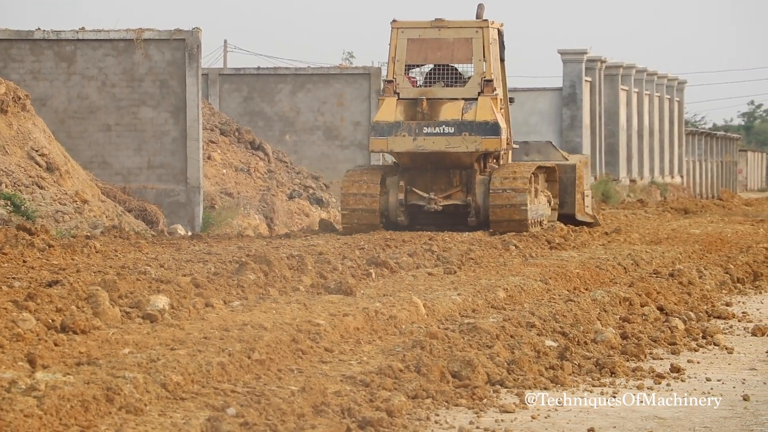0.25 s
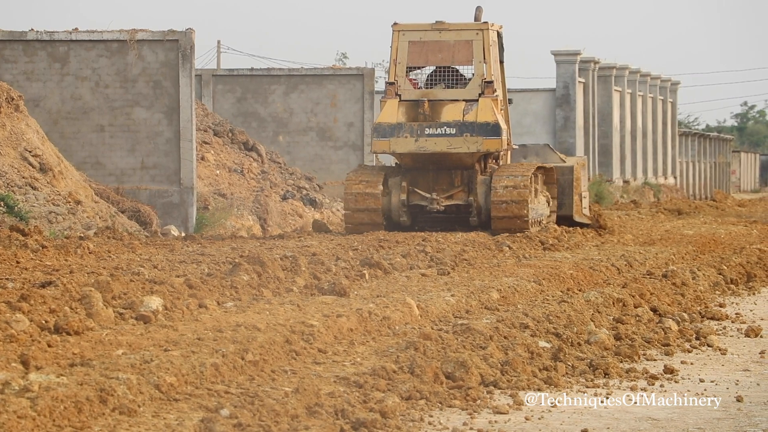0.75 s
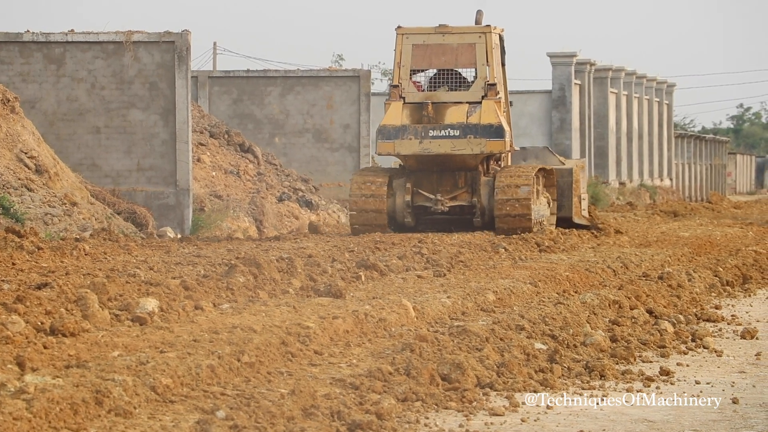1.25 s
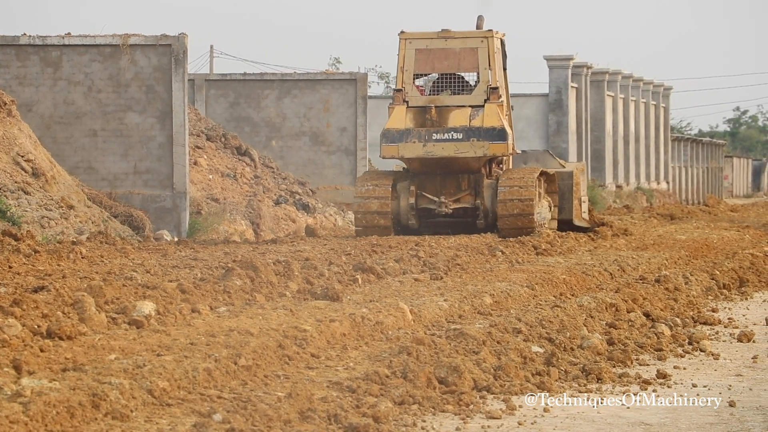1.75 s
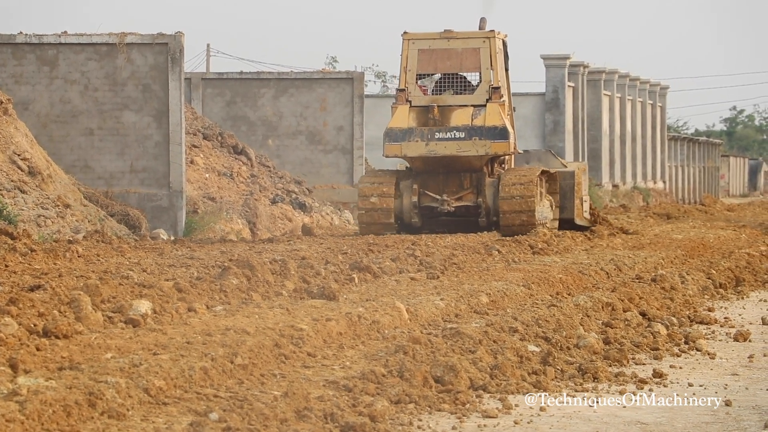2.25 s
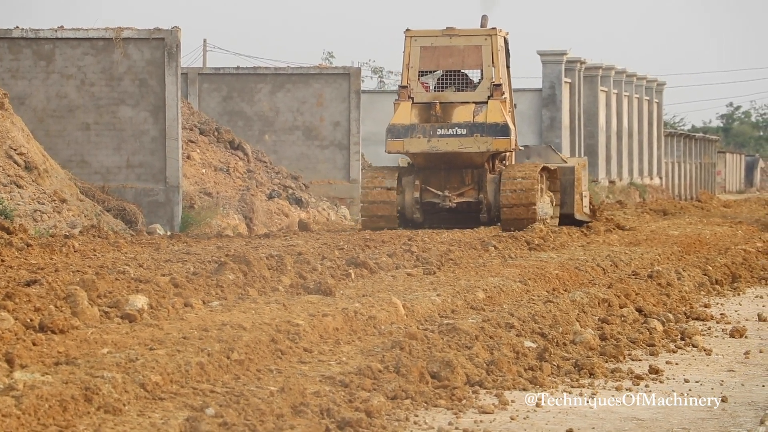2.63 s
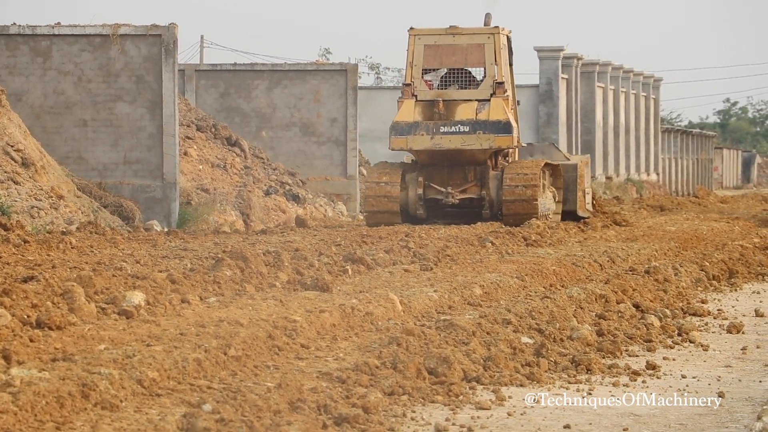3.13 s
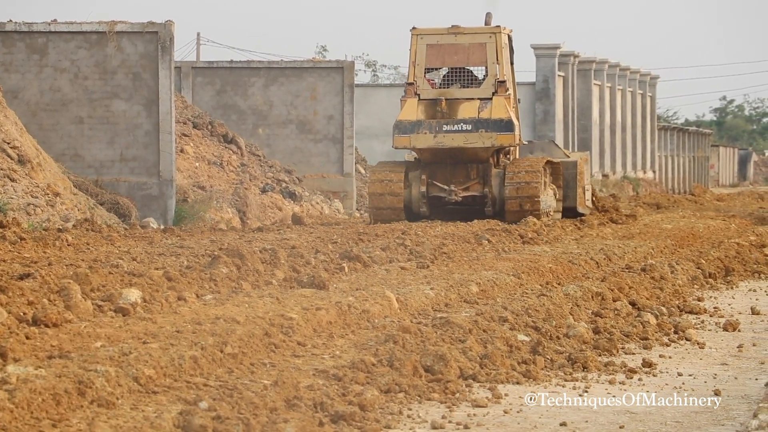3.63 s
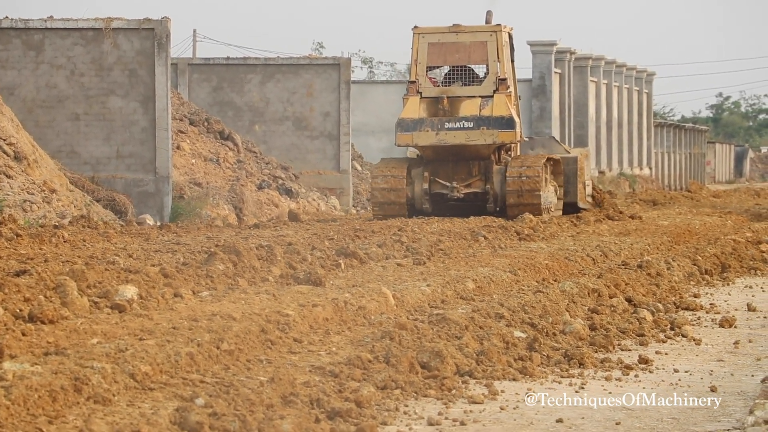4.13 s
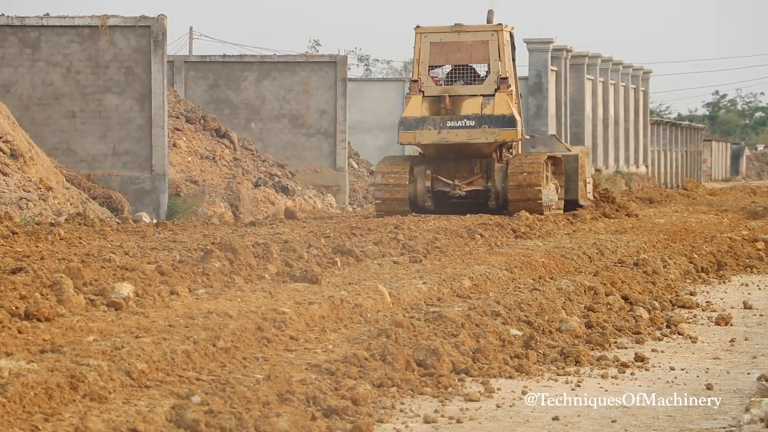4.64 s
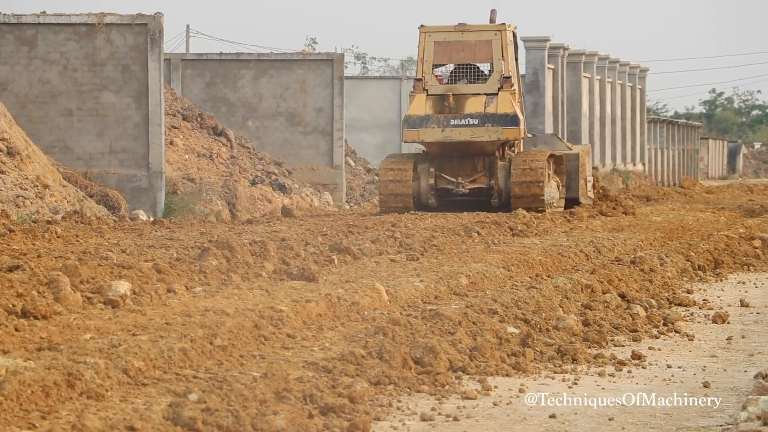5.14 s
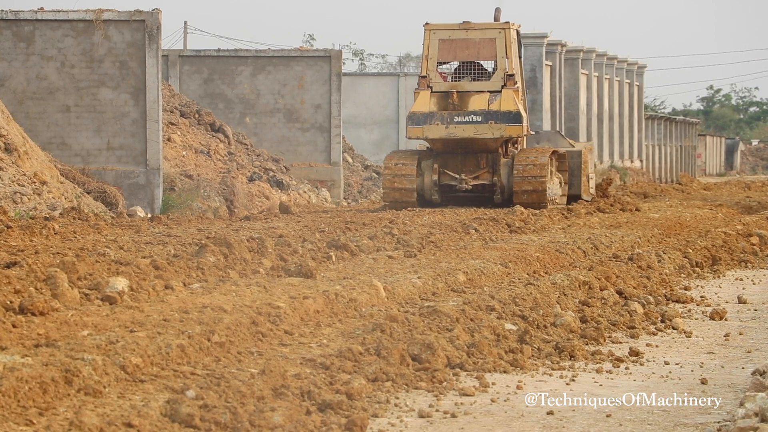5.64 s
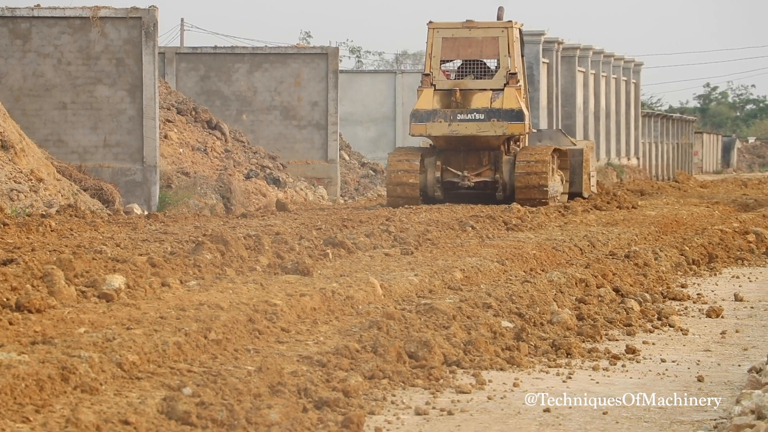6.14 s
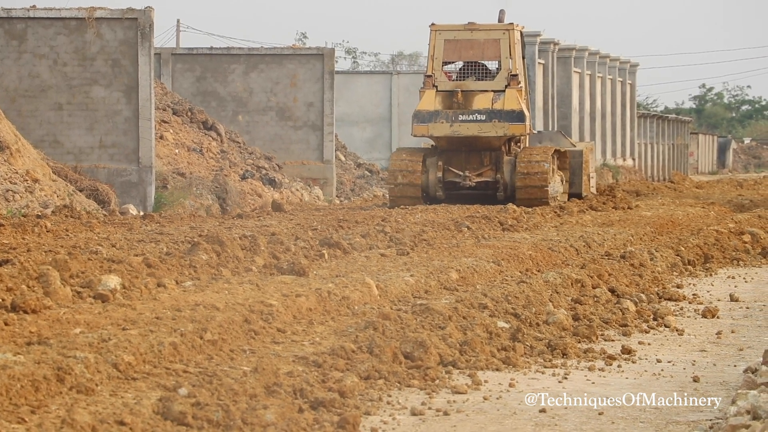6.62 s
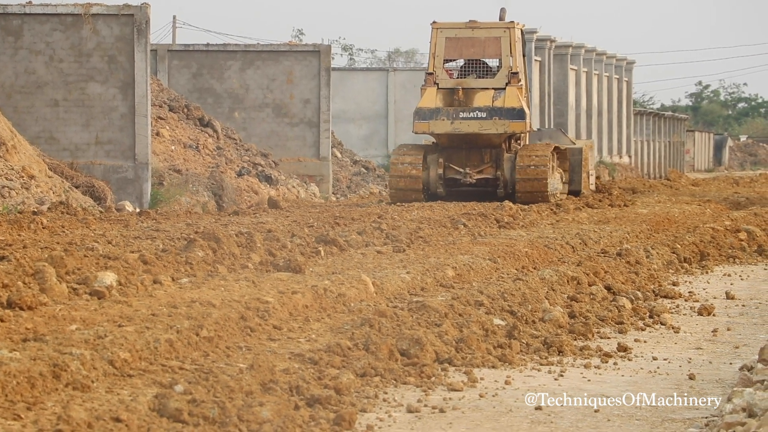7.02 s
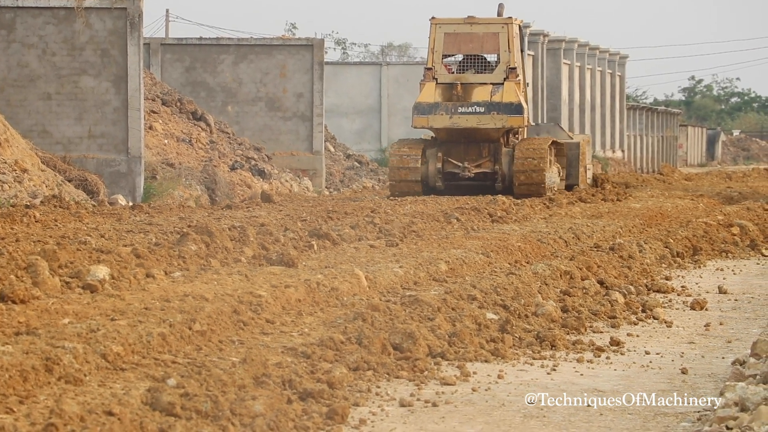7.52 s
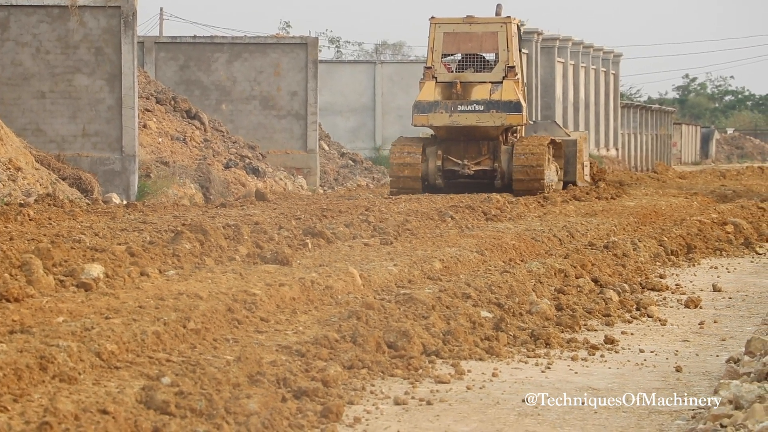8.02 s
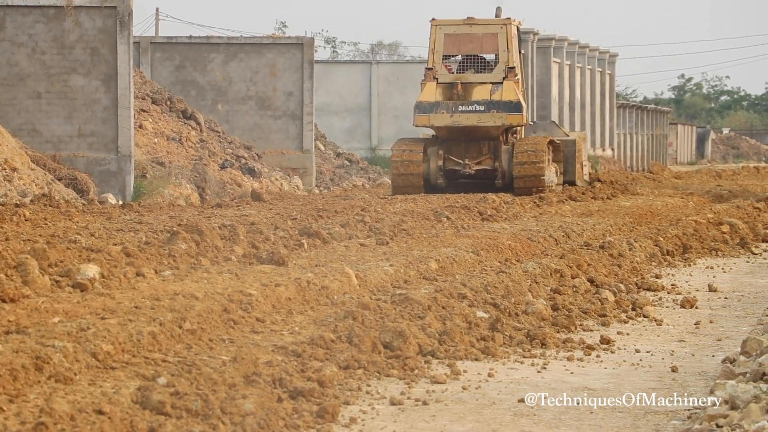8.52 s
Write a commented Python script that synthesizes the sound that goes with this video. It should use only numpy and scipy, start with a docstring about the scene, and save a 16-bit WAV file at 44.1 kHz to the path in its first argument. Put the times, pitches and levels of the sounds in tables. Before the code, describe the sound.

Stereo outdoor pickup from over ten metres behind a tracked machine. The engine holds a low hum near 98 hertz with roar, midrange clatter and fan tone, fading very gradually with distance. Over it, fluttering track squeals near 3.2 kilohertz start and stop irregularly, joined by sharp grinding on stones and short plate pings, thickest halfway through. Concrete walls give short scattered echoes. Soft insect hisses and slight wind rumble sit close by.

```python
"""On bare earth beside concrete walls, a six-cylinder diesel crawler dozer works away from the listener.
Exhaust orders drone over coloured-noise roar and clatter, whining shafts, and tones of fan and gears.
Dry track pins squeal by stick-slip, links whistle, shoes ping over the sprocket, knock on the ground
and grind on stones as driven resonances; the tracks echo off the walls. Close by on the right
an insect buzzes in bursts of gated hiss, and light wind rumbles in gusts."""
import sys
import numpy as np
from scipy import signal
from scipy.fft import rfft, irfft, next_fast_len
from scipy.io import wavfile
from scipy.ndimage import uniform_filter1d

SR = 44100
rng = np.random.default_rng(int(sys.argv[2]) if len(sys.argv) > 2 else 0)


def how_loud(loudness_db):
    """Turn decibels into a plain amplitude multiplier (0 dB gives 1, 20 dB gives 10)."""
    steps = np.asarray(loudness_db, float) / 20
    return 10 ** steps


def log_audio(samples):
    """Write samples as a 16-bit WAV file to the path given in sys.argv[1]."""
    # one column per channel
    frames = np.atleast_2d(samples).T
    # limit to full scale, then quantise
    limited = np.clip(frames, -1, 1)
    pcm = np.round(limited * 32767).astype(np.int16)
    wavfile.write(sys.argv[1], SR, pcm)


N = 386757  # samples


def evened(x):
    """Normalisation of power: scales a signal to rms 1."""
    return x / np.sqrt(np.mean(x ** 2) + 1e-20)


def read(points, hz):
    """Interpolation of a spectrum table along logarithmic frequency."""
    f, value = np.transpose(points)
    return np.interp(np.log(hz + 1), np.log(f + 1), value)


def wander(n, seconds):
    """Low-pass random process: twice-smoothed noise of rms about 1."""
    width = max(int(seconds * SR), 2)
    smooth = uniform_filter1d(uniform_filter1d(rng.standard_normal(n), width), width)
    return smooth * np.sqrt(1.553 * width)


def oscillator_phase(hz):
    """Frequency modulation: phase in radians is the running integral of frequency."""
    return 2 * np.pi * np.cumsum(hz) / SR


def colour(x, points):
    """Linear filtering: shapes a signal by a spectrum table, then scales it to rms 1."""
    n = next_fast_len(len(x) + 256)
    gain = how_loud(read(points, np.fft.rfftfreq(n, 1 / SR)))
    return evened(irfft(rfft(x, n) * gain, n)[:len(x)])


def resonate(x, hz, width):
    """Heterodyne resonator: shifts the curve hz down to zero, smooths twice, and shifts back."""
    turn = np.exp(1j * oscillator_phase(hz))
    r = np.exp(-np.pi * width / SR)
    return 2 * (turn * signal.lfilter([(1 - r) ** 2], [1, -2 * r, r * r], x / turn)).real


def unroll(rows):
    """Piecewise-linear control: first sample and the columns of a table at sample rate."""
    s, *columns = np.transpose(rows)
    t = np.arange(s[0], s[-1], 1 / SR)
    return round(s[0] * SR), [np.interp(t, s, c) for c in columns]


def add(mix, at, sound, pan_db):
    """Superposition with intensity panning: soft-ended sound, pan_db louder at left than right."""
    placed = sound * signal.windows.tukey(len(sound), .04) * how_loud(np.array([pan_db / 2, -pan_db / 2]))
    part = mix[:, at:at + len(sound)]
    part += placed[:, :part.shape[1]]


# Left-right likeness of broad noise. Each row: frequency in Hz, correlation from 0 to 1.
LIKENESS = [(60, 1), (150, 1), (380, 0.97), (950, 0.85), (2380, 0.71), (5980, 0.77), (15000, 0.16)]
# Left-right balance of broad noise. Each row: frequency in Hz, left over right in dB.
BALANCE = [(60, 5.5), (180, 0.5), (550, 1), (1650, -1), (4970, -1), (15000, -2)]


def rush(spectrum, patchy_db):
    """Partial coherence: random short-time spectra in drifting patches, partly alike in both channels."""
    frames, hz = N // 256 + 5, np.fft.rfftfreq(1024, 1 / SR)
    a, b, c, d, patches = rng.standard_normal((frames, 513, 5)).T
    patches = evened(uniform_filter1d(uniform_filter1d(patches, 10, 0), 12, 1))
    same = np.clip(read(LIKENESS, hz), -1, 1)[:, None]
    lean_db = read(BALANCE, hz)[:, None] / 2
    left = a + 1j * b
    right = same * left + np.sqrt(1 - same ** 2) * (c + 1j * d)
    z = np.array([left * how_loud(lean_db), right * how_loud(-lean_db)])
    z *= how_loud(read(spectrum, hz)[:, None] + patchy_db * patches)
    return evened(signal.istft(z, nperseg=1024, noverlap=768)[1][:, :N])


def receding_db():
    """Spherical spreading: loss with distance as the machine drives away."""
    start_m, speed_m_per_s = 13.2, 1
    return -20 * np.log10(1 + speed_m_per_s * np.arange(N) / SR / start_m)


# Exhaust tones. Each row: multiple of the four-stroke cycle rate, level in dB against the firing tone.
EXHAUST_ORDERS = [(3, -23.5), (5, -29), (6, 0), (7, -33), (8, -24), (9, -17), (10, -21), (11, -23.5),
                  (12, -28), (15, -35.5)]


def exhaust(cycle):
    """Harmonic synthesis: orders of the cycle phase, each with a slightly fluttering level."""
    return sum(how_loud(db + .5 * wander(N, 0.0031)) * np.sin(k * cycle + 2 * np.pi * rng.random())
               for k, db in EXHAUST_ORDERS)


# Pumps and shafts geared to the crank.
# Each row: multiple of the firing rate, relative level in dB, pitch wander in Hz.
SHAFT_WHINES = [(.895, -44, 0.75), (1.19, -48, 1.3), (1.82, -45, 1.68), (4.05, -55, 1.483),
                (5.46, -56.5, 2.59), (6.41, -54, 12.5), (8.49, -49, 3.54)]


def shaft_whines(firing_hz):
    """Gear ratio: tones at fixed multiples of the firing rate, wandering in pitch and level."""
    return sum(how_loud(db + 1.36 * wander(N, 0.15))
               * np.sin(oscillator_phase(k * firing_hz + hz * wander(N, 0.0944)))
               for k, db, hz in SHAFT_WHINES)


# Spectrum of the low roar. Each row: frequency in Hz, density in dB per Hz.
ROAR_SPECTRUM = [(12, -55), (20, -25), (43, -21), (67, -5.5), (97, -6.5), (121, 3), (146, -19), (236, -5),
                 (426, -13.5), (900, -24), (1170, -74), (1980, -120)]
# Spectrum of the clatter, also of the undercarriage. Each row: frequency in Hz, density in dB per Hz.
CLATTER_SPECTRUM = [(350, -66), (600, -3), (720, -6), (807, -6), (1190, 1.5), (1810, -5.5), (2210, -5),
                    (2700, -9.5), (3300, -10), (4800, -22.5), (6240, -74), (10600, -120)]


def roar_and_clatter(cycle):
    """Amplitude modulation: steady roar beside clatter that throbs unevenly with each firing."""
    roar_db, clatter_db = -30, -30.5  # at the starting distance
    since_firing = cycle * 3 / np.pi % 1  # six firings a cycle
    throb = .9 + .22 * np.exp(-since_firing / .3) * how_loud(5 * wander(N, .01))
    throb = uniform_filter1d(throb, size=40)
    roar = how_loud(roar_db + 1.16 * receding_db()) * rush(ROAR_SPECTRUM, 0.96)
    return roar + throb * how_loud(clatter_db + receding_db()) * rush(CLATTER_SPECTRUM, 1.04)


# Spectrum of the track rustle. Each row: frequency in Hz, density in dB per Hz.
RUSTLE_SPECTRUM = [(2820, -10), (4800, -8.5), (5090, -2), (6840, 1), (9020, -8), (11100, -12), (15600, -25)]
# Each row: time in seconds, level of the exhaust drone in dB, level of the track rustle in dB.
DRONE_AND_RUSTLE = [(0.0, -25, -48), (0.05, -24, -47), (0.73, -25, -44), (0.88, -30, -45.5),
                    (1.36, -23.5, -47), (1.81, -23, -53), (2.07, -25.5, -50.5), (2.86, -22, -46),
                    (3.27, -23, -48.5), (3.61, -23.5, -40), (4.1, -23, -49), (4.35, -25, -51),
                    (5.18, -23, -47), (5.52, -22.5, -52.5), (5.79, -25.5, -49.5), (6.86, -24, -48),
                    (7.06, -26, -52.5), (7.45, -26, -52), (7.91, -23.5, -55.5), (8.4, -26.5, -54),
                    (8.72, -25, -43), (8.77, -27, -45)]


def engine():
    """Common periodicity: one wandering firing rate drives drone, whines and throb; tracks rustle along."""
    s, *columns = np.transpose(DRONE_AND_RUSTLE)
    drone_db, rustle_db = (np.interp(np.arange(N) / SR, s, c) for c in columns)
    firing_hz, sag_hz_per_s, hunt_hz = 97.83, .05, .2
    firing_hz = firing_hz - sag_hz_per_s * np.arange(N) / SR + hunt_hz * wander(N, 0.574)
    cycle = oscillator_phase(firing_hz) / 6
    drone = how_loud(drone_db) * exhaust(cycle)
    whine = how_loud(2.5 + receding_db()) * shaft_whines(firing_hz)
    rustle = how_loud(rustle_db) * rush(RUSTLE_SPECTRUM, 3.1)
    return np.sqrt(2) * (drone + whine) + roar_and_clatter(cycle) + rustle


# Centre pitches of the two gear meshes in Hz, lower then upper.
MESH_PITCHES = (1161, 2165)
# The meshes sing louder under load.
# Each row: time in seconds, relative level of the lower mesh in dB, and of the upper in dB.
MESH_LEVELS = [(0.0, -39.5, -61), (0.88, -39, -45), (0.98, -52, -40), (1.41, -48, -73), (1.98, -53, -59),
               (2.39, -45, -50), (2.54, -42, -38.5), (3.2, -41, -53), (3.81, -56, -54), (4.62, -38.5, -50),
               (4.91, -46, -52), (5.25, -39.5, -49), (5.44, -60, -63), (6.84, -44, -51), (8.13, -56, -55),
               (8.33, -46, -49), (8.55, -48, -44.5), (8.77, -39, -58)]


def fan_and_gears():
    """Blade passing and tooth meshing: near steady tones whose strength drifts."""
    t = np.arange(N) / SR
    fan_hz, fan_db, octave_db = 233.3, -34.5, -49.5  # levels at the starting distance
    blades = oscillator_phase(fan_hz + .5 * wander(N, 0.465))
    tones = how_loud(fan_db + 1.05 * wander(N, 0.072)) * np.sin(blades)
    tones += how_loud(octave_db + 4.1 * wander(N, .2)) * np.sin(2 * blades)
    tones *= how_loud(receding_db())
    s, *levels_db = np.transpose(MESH_LEVELS)
    for hz, db in zip(MESH_PITCHES, levels_db):
        tones += how_loud(np.interp(t, s, db) - 2.0) * np.sin(oscillator_phase(hz + 3.5 * wander(N, 0.1016)))
    return np.sqrt(2) * tones


# Dry pins, one list a stretch of squealing; a long squeal runs on through several lists.
# Each row: time in seconds, pitch in Hz, fundamental level in dB, second-partial level in dB.
PIN_SQUEALS = [
    [(0.0, 3010, -42, -55), (0.012, 3240, -47, -75), (0.03, 3159, -48, -58), (0.056, 3122, -48, -55),
     (0.064, 3151, -49, -78), (0.094, 3090, -32.5, -48), (0.122, 3098, -48, -61), (0.134, 3310, -41, -69),
     (0.192, 3023, -43, -62), (0.2, 3117, -44, -76)],
    [(0.2, 3100, -45, -70), (0.216, 2986, -28, -44), (0.24, 2880, -33, -47), (0.262, 3440, -50, -56),
     (0.296, 3122, -33, -57), (0.304, 3165, -41, -68), (0.342, 2970, -27.5, -42), (0.388, 3230, -40, -72),
     (0.408, 3350, -53, -74), (0.41, 3254, -53, -94)],
    [(0.42, 3277, -46, -64), (0.458, 2960, -26, -48), (0.492, 3250, -42, -65), (0.52, 3170, -31, -54),
     (0.524, 3188, -33, -86), (0.526, 3200, -31, -73), (0.546, 3087, -42, -60), (0.598, 3311, -33, -62),
     (0.608, 3263, -43, -56), (0.635, 2880, -47, -71)],
    [(0.69, 2980, -49, -76), (0.71, 3220, -36, -64), (0.756, 3320, -41, -57), (0.76, 3310, -40, -84),
     (0.762, 3233, -37, -69), (0.774, 3197, -36, -50), (0.804, 3235, -33, -43), (0.816, 3281, -40, -62),
     (0.824, 3210, -36, -40), (0.84, 3200, -46, -60)],
    [(1.105, 3175, -52, -64), (1.121, 3227, -35, -66), (1.143, 3156, -49, -55), (1.157, 2951, -21.5, -48),
     (1.171, 2969, -22, -38), (1.191, 2986, -33, -61), (1.207, 3261, -41, -77), (1.219, 3285, -42, -60),
     (1.289, 3202, -37, -55), (1.36, 3177, -47, -70)],
    [(1.58, 3150, -50, -65), (1.588, 3255, -43, -71), (1.606, 3278, -36, -57), (1.612, 3310, -34, -67),
     (1.628, 3246, -49, -70), (1.676, 3230, -42, -67), (1.686, 3260, -35, -58), (1.692, 3290, -41, -69),
     (1.704, 3255, -39, -42), (1.735, 3230, -44, -72)],
    [(2.43, 3300, -48, -65), (2.434, 3229, -43, -57), (2.462, 3318, -37, -66), (2.482, 3374, -41, -45),
     (2.492, 3370, -28, -65), (2.496, 3352, -30, -57), (2.504, 3250, -37, -55), (2.552, 3310, -33, -54),
     (2.564, 3350, -32.5, -49), (2.575, 3363, -46, -65)],
    [(2.64, 3090, -38, -62), (2.664, 3083, -44, -71), (2.682, 3314, -38, -59), (2.702, 3183, -42, -66),
     (2.718, 3190, -47, -54), (2.76, 3187, -42, -65), (2.778, 2897, -54, -58), (2.784, 2880, -48, -73),
     (2.796, 3297, -33, -53), (2.81, 3340, -52, -55)],
    [(2.865, 3066, -49, -59), (2.871, 3249, -39, -50), (2.899, 2923, -26.5, -40), (2.917, 3118, -42, -53),
     (2.969, 3250, -38.5, -55), (3.029, 2930, -35, -40), (3.039, 3036, -33, -64), (3.051, 3178, -38, -51),
     (3.069, 3162, -30, -67), (3.09, 3171, -31, -62)],
    [(3.09, 3200, -36, -62), (3.112, 3150, -34, -71), (3.118, 3180, -40, -61), (3.168, 3272, -39.5, -49),
     (3.18, 3158, -50, -56), (3.206, 3183, -32, -60), (3.222, 3240, -42, -53), (3.254, 3083, -37, -69),
     (3.294, 3280, -40, -58), (3.31, 3160, -48, -65)],
    [(3.34, 3395, -50, -58), (3.356, 3170, -39, -56), (3.4, 3190, -43, -48), (3.416, 3165, -28, -60),
     (3.43, 3213, -32, -45), (3.452, 3210, -31, -56), (3.458, 3200, -30, -42), (3.496, 3100, -36, -57),
     (3.502, 3150, -33, -46), (3.52, 3054, -50, -64)],
    [(3.555, 2900, -43, -70), (3.573, 3260, -47, -56), (3.585, 3210, -31, -46), (3.643, 3170, -48, -66),
     (3.661, 3210, -34, -63), (3.745, 3200, -31, -56), (3.753, 3230, -30, -69), (3.765, 3200, -41, -46),
     (3.773, 3321, -36, -74), (3.8, 3225, -34, -59)],
    [(3.8, 3180, -31, -54), (3.822, 3199, -44, -61), (3.832, 3200, -31, -51), (3.842, 3110, -39, -70),
     (3.852, 3250, -35, -49), (3.904, 3244, -32.5, -55), (3.948, 3250, -43, -45), (4.018, 3270, -32, -42),
     (4.076, 3257, -32, -39), (4.09, 3306, -38, -39)],
    [(4.09, 3303, -39, -43), (4.124, 3133, -33, -46), (4.134, 3180, -28, -37), (4.144, 3320, -37, -66),
     (4.16, 3250, -32.5, -54), (4.22, 3241, -41, -57), (4.23, 3123, -38, -65), (4.254, 3180, -34, -55),
     (4.26, 3380, -28, -68), (4.29, 3180, -42, -68)],
    [(4.55, 3414, -48, -52), (4.574, 3346, -35.5, -63), (4.646, 3254, -44, -69), (4.652, 3410, -42, -67),
     (4.732, 3255, -37.5, -57), (4.752, 3010, -38, -66), (4.764, 3480, -42, -70), (4.772, 3196, -44, -71),
     (4.822, 3340, -32, -66), (4.85, 3264, -42, -78)],
    [(4.955, 3240, -46, -63), (4.965, 3280, -37, -90), (4.969, 3250, -41, -78), (5.029, 3273, -37, -61),
     (5.049, 3318, -43, -74), (5.065, 3300, -28, -56), (5.073, 3370, -33, -71), (5.095, 3180, -37, -58),
     (5.113, 3340, -37, -72), (5.125, 3470, -49, -60)],
    [(5.155, 3380, -48, -73), (5.159, 3391, -43, -81), (5.175, 3394, -40, -53), (5.185, 3317, -36, -70),
     (5.199, 3296, -25.5, -53), (5.207, 3335, -36, -65), (5.271, 3113, -51, -78), (5.289, 3110, -59, -68),
     (5.301, 3366, -39, -61), (5.33, 3307, -48, -63)],
    [(5.385, 3277, -52, -78), (5.393, 3184, -38.5, -71), (5.445, 3077, -34, -50), (5.455, 3130, -33, -68),
     (5.471, 3312, -42, -60), (5.493, 3328, -38, -77), (5.513, 3340, -39, -57), (5.549, 3320, -40, -78),
     (5.569, 3320, -34.5, -64), (5.585, 3317, -54, -60)],
    [(5.885, 3257, -52, -69), (5.889, 3220, -43, -73), (5.891, 3214, -39, -96), (5.893, 3209, -31, -71),
     (5.899, 3210, -31.5, -62), (5.947, 3270, -40, -57), (5.955, 3230, -36, -78), (5.963, 3207, -38, -68),
     (5.997, 3187, -47, -82), (6.0, 3195, -50, -74)],
    [(6.055, 3397, -44, -69), (6.067, 3039, -33, -54), (6.097, 3224, -33.5, -60), (6.103, 3220, -30, -46),
     (6.141, 3250, -35, -52), (6.151, 3420, -36.5, -67), (6.187, 3240, -40, -48), (6.221, 3226, -35.5, -68),
     (6.267, 3220, -31.5, -56), (6.28, 3260, -44, -64)],
    [(6.28, 3280, -47, -51), (6.308, 3180, -35, -66), (6.37, 3371, -43, -58), (6.404, 3245, -30, -68),
     (6.426, 3330, -44, -60), (6.524, 3389, -31, -60), (6.544, 3090, -30, -64), (6.55, 3100, -30, -81),
     (6.556, 3111, -40, -53), (6.575, 3250, -53, -69)],
    [(6.74, 3383, -54, -64), (6.75, 3275, -30, -68), (6.758, 3260, -48, -66), (6.81, 3283, -39, -57),
     (6.834, 3305, -35, -67), (6.84, 3347, -32, -54), (6.862, 3320, -46, -59), (6.876, 3350, -28, -42),
     (6.888, 3317, -28, -64), (6.9, 3186, -42, -68)],
    [(6.915, 3274, -49, -76), (6.943, 3434, -29.5, -46), (6.951, 3373, -32, -63), (6.973, 3352, -37, -47),
     (6.993, 3400, -35, -60), (6.997, 3434, -29.5, -42), (7.025, 3394, -30, -48), (7.063, 3340, -44, -48),
     (7.079, 3130, -39, -69), (7.1, 3300, -43, -72)],
    [(7.12, 3103, -50, -71), (7.128, 3193, -40, -88), (7.164, 3302, -36, -54), (7.182, 3323, -39, -75),
     (7.19, 3205, -51, -87), (7.206, 3296, -41, -50), (7.238, 3327, -48, -49), (7.248, 3281, -45, -61),
     (7.3, 3284, -39, -58), (7.31, 3217, -54, -71)],
    [(8.53, 3409, -51, -83), (8.546, 3310, -37, -50), (8.586, 3255, -59, -66), (8.612, 3250, -39.5, -67),
     (8.676, 3190, -33.5, -47), (8.712, 3230, -38, -64), (8.726, 3233, -43, -52), (8.738, 3175, -49, -66),
     (8.758, 3200, -30, -50), (8.77, 3213, -28, -66)],
    [(0.94, 3200, -51, -69), (0.954, 3320, -38, -64), (0.965, 3432, -50, -67)],
    [(1.43, 3293, -54, -60), (1.446, 3166, -35, -81), (1.454, 3150, -45, -58), (1.46, 3293, -54, -65)],
    [(2.065, 3290, -48, -60), (2.073, 3300, -46, -58), (2.099, 3320, -43, -80), (2.11, 3302, -48, -62)],
    [(4.315, 3251, -50, -70), (4.337, 3280, -31.5, -49), (4.389, 3400, -41, -61), (4.405, 3348, -49, -74)],
    [(7.68, 3220, -42, -68), (7.73, 3270, -49, -75), (7.766, 3330, -39, -60), (7.79, 3311, -54, -87)],
    [(8.01, 3265, -49, -75), (8.024, 3360, -49, -67), (8.032, 3440, -47, -63), (8.04, 3500, -50, -67)],
    [(8.14, 3337, -51, -79), (8.148, 3300, -38, -64), (8.164, 3276, -39, -66), (8.175, 3258, -51, -64)],
]


def squeal(rows):
    """Stick-slip of a dry pin: a gliding near sine that flutters, with overtones that come and go."""
    at, (hz, db, second_db) = unroll(rows)
    n = len(hz)
    phase = oscillator_phase(hz + 25 * wander(n, 0.0037))
    frayed = evened(resonate(rng.standard_normal(n), hz, 190))  # the pin also chatters around its pitch
    third = how_loud(-12 + 6.5 * wander(n, 0.043))  # against the second partial
    upper = np.sin(2 * phase) + third * (np.sin(3 * phase) + 0.2 * np.sin(4 * phase))
    lower = 0.98 * np.sin(phase) + 0.072 * frayed
    flutter = how_loud(3.4 * wander(n, 0.0042))
    return at, np.sqrt(2) * flutter * (how_loud(db) * lower + how_loud(second_db) * upper), np.full(n, -4.6)


# Each row: start in seconds, length in seconds, pitch in Hz, mid-whistle level in dB.
LINK_WHISTLES = [(.24, 0.043, 3920, -42), (.25, 0.034, 2470, -35), (.345, 0.022, 4050, -41),
                 (.6, .03, 4850, -49), (.72, .025, 4900, -42), (.74, 0.022, 2420, -33.5),
                 (1.59, .14, 3670, -45), (3.789, 0.038, 3710, -34), (4.545, .02, 4230, -42),
                 (4.897, .03, 5750, -50), (4.962, .03, 5830, -46), (5.01, .035, 11520, -50),
                 (6.156, .08, 8640, -42), (6.323, 0.03, 11040, -48)]


def whistle(s, length, hz, db):
    """Friction-driven vibration: a single mode of a link sings while it rubs."""
    u = np.linspace(-1, 1, round(length * SR))
    phase = oscillator_phase(hz + 30 * wander(len(u), 0.0034))
    edge_db = -8.5  # softer towards both ends
    level = how_loud(db + edge_db * u ** 2 + 3.0 * wander(len(u), 0.0038))
    return round(s * SR), np.sqrt(2) * level * np.sin(phase), np.full(len(u), -2.4)


def chirps():
    """Random point process: faint high whistles of other links, stronger where the tracks rustle more."""
    when, long, pitch, size = rng.random((60, 4)).T
    s = when * N / SR
    over_rustle_db = -3 + 6 * (size - .5)
    db = np.interp(s, *np.transpose(DRONE_AND_RUSTLE)[::2]) + over_rustle_db
    return zip(s, 0.023 * (.4 + 1.24 * long), 5400 * 2.1 ** pitch, db)


# Spectrum of the grit. Each row: frequency in Hz, density in dB per Hz.
GRIT_SPECTRUM = [(2120, -24), (3600, 3), (4040, 0), (5170, -12), (5880, 0), (7470, 0), (9200, -5),
                 (12400, -12.5), (15600, -26)]
# Modes of the shoe plate. Each row: nominal frequency in Hz, width in Hz, mean level in dB.
PLATE_MODES = [(5400, 260, -1), (6400, 190, -11), (7200, 320, 1.5), (8100, 320, 4), (8260, 180, -4),
               (10200, 250, -3), (11230, 460, -5.5), (12800, 400, -25)]
# Strong grinds of steel on stone. Each row: start in seconds, length before the fade in seconds,
# strongest ring in Hz, level in dB, share of that ring from 0 to 1.
STONE_GRINDS = [(0.087, .027, 8170, -45, 0.6), (.194, .01, 9780, -40, 1), (.59, 0.043, 5400, -40.5, 0.4),
                (.674, 0.012, 5380, -44, 0.5), (.7, 0.051, 7000, -44, .2), (0.86, 0.033, 8330, -47, .14),
                (0.978, 0.016, 7920, -48, 0.2), (1.036, 0.043, 6750, -53, 0.2),
                (1.241, 0.043, 7500, -50, .13), (1.371, .024, 5400, -47.5, .12),
                (1.432, .01, 7500, -46, .48), (1.49, 0.022, 6560, -45, .23), (1.644, .028, 8200, -47, 0),
                (2.048, .058, 5630, -49, 1), (2.714, .2, 6400, -50.5, 0), (2.99, 0.026, 10700, -44, 0.5),
                (3.173, 0.022, 9200, -46, 0.5), (3.3, 0.068, 7770, -40, 0.04),
                (3.379, 0.02, 7200, -43.5, .12), (3.457, 0.051, 5900, -36.5, 0.5),
                (3.517, 0.013, 5870, -40, 0.4), (3.576, .01, 8150, -32, 0.3),
                (3.592, 0.034, 7320, -32, 0.4), (3.673, 0.045, 5590, -43, .11),
                (3.725, .016, 7110, -25.5, 0.8), (3.766, .009, 6350, -33, 0.8),
                (3.797, 0.019, 7250, -29, 0.68), (3.851, 0.024, 7280, -47, .18),
                (4.013, .008, 7160, -28.5, 0.85), (4.043, 0.015, 6810, -37, 0.2),
                (4.072, 0.036, 7530, -31, .23), (4.108, 0.024, 6910, -28, 0.77),
                (4.152, .01, 8360, -42, .05), (4.197, 0.017, 7920, -36, .06),
                (4.221, 0.0065, 9600, -29.5, 0.96), (4.242, .011, 7600, -42, 0),
                (4.322, 0.0095, 7420, -44, .23), (4.352, 0.019, 7060, -42, 0.2),
                (4.502, 0.024, 5600, -45, .26), (4.55, 0.0053, 6750, -38, 0.3),
                (4.581, 0.017, 5850, -42, .8), (4.773, 0.027, 5960, -47, 0.7),
                (5.01, 0.033, 5740, -41.5, 0.9), (5.32, 0.051, 6140, -39.8, 0.97),
                (5.508, 0.018, 5545, -45, .27), (5.685, 0.092, 6380, -41.5, .87),
                (5.789, 0.041, 6640, -43.5, .2), (6.14, .005, 7110, -38, .52),
                (6.171, 0.02, 8620, -39, 0.4), (6.228, .01, 8670, -39, 0.5), (6.263, 0.0083, 7600, -42, .1),
                (6.325, 0.024, 7880, -43.5, 0.4), (6.412, 0.03, 8850, -42, 0.4), (6.456, .01, 7750, -42, 0),
                (6.495, 0.011, 6050, -38.5, 0.3), (6.538, 0.021, 7060, -45, .12),
                (6.619, 0.0088, 8450, -40.5, .29), (6.891, 0.027, 7660, -39.5, 0.8),
                (7.221, 0.039, 7500, -31.5, 1), (7.508, 0.045, 6140, -38, 0.96),
                (7.574, 0.018, 6060, -41, 0.83), (7.815, 0.041, 10540, -46, 0.86),
                (8.306, .008, 9230, -46, 0.95), (8.42, 0.043, 8440, -44, 0.93),
                (8.67, .015, 7270, -42.5, 0.9), (8.71, .008, 7260, -41, 0.5),
                (8.748, 0.014, 6800, -45, 0.4)]


def grind(s, length, ring_hz, db, share):
    """Forced resonance: dense uneven slips give grit, stir plate modes and drive one ring hard."""
    n, share = round((length + 0.007) * SR), np.clip(share, 0, 1)
    t = np.arange(n) / SR
    slips = rng.standard_normal(n) * how_loud(2.2 * wander(n, .002))
    plate = sum(how_loud(mode_db + 3.4 * rng.standard_normal())
                * resonate(slips, np.full(n, hz * rng.uniform(0.94, 1.04)), width)
                for hz, width, mode_db in PLATE_MODES)
    rough = 1.54 * colour(slips, GRIT_SPECTRUM) + 0.6 * evened(plate)
    # the larger its share, the steadier and narrower the ring
    ring_curve = ring_hz + 300 * (1 - share) * wander(n, 0.0055)
    ring = evened(resonate(slips, ring_curve, 80 + 450 * (1 - share)))
    stroke = np.minimum(t / .006, 1) * how_loud(-60 * np.maximum(t - length, 0) / .04)
    sound = how_loud(db) * stroke * (np.sqrt(1 - share) * rough + np.sqrt(share) * ring)
    return round(s * SR), sound, np.full(n, -3)


def faint_grinds():
    """Random point process: small grinds at chance moments, stronger where the tracks rustle more."""
    when, long, pitch, size, pure = rng.random((42, 5)).T
    s = when * N / SR
    over_rustle_db = -0.5 - 6 * (size - .5)
    db = np.interp(s, *np.transpose(DRONE_AND_RUSTLE)[::2]) + over_rustle_db
    return zip(s, 0.0085 + 2 * 0.019 * long ** 2, 5300 + 3200 * pitch, db, .6 * pure ** 2)


# Ringing mode of a shoe. Each row: frequency in Hz, gain in dB, decay time to -60 dB in seconds.
SHOE_MODES = [(4752, 6, .055)]
# A track shoe meets a sprocket tooth. Each row: start in seconds, strike level in dB before the mode's gain.
SPROCKET_PINGS = [(0.0772, -43), (0.2553, -49), (0.3356, -45), (0.4469, -48), (1.045, -48), (1.1772, -44),
                  (1.273, -41), (1.9101, -41), (2.0343, -46), (2.2947, -41), (3.0016, -40), (3.1802, -43),
                  (3.2465, -41), (3.496, -38), (3.7309, -41), (4.2403, -34), (4.4857, -38), (4.591, -34),
                  (4.7092, -41), (4.8289, -37), (4.9467, -48), (5.0634, -44), (5.1951, -47), (5.3078, -53),
                  (5.5538, -51), (5.9314, -49), (6.4233, -52), (7.0334, -46), (7.1571, -40), (7.2764, -38),
                  (7.4011, -39), (7.646, -53), (7.7493, -45), (8.1324, -46), (8.2412, -50)]


def ping(s, db):
    """Free decay: a struck shoe rings briefly."""
    t = np.arange(4000) / SR
    ring = sum(how_loud(gain_db - 60 * t / t60) * np.sin(2 * np.pi * hz * t) for hz, gain_db, t60 in SHOE_MODES)
    return round(s * SR), how_loud(db) * ring * np.minimum(t / 0.0011, 1), np.full(len(t), -1.5)


# Dull knocks of track shoes on the ground. Each row: time in seconds, approximate peak level in dB.
GROUND_KNOCKS = [(0.2547, -22), (0.609, -17), (0.7357, -20), (1.3444, -22), (1.5856, -20), (5.851, -25),
                 (6.9401, -18), (7.154, -27)]


def knock(s, db):
    """Damped impact: a short noise puff with the colour of the undercarriage."""
    t = np.arange(4000) / SR
    t60_s, crest_db = 0.082, 9  # crest: allowance for peak over rms
    puff = colour(rng.standard_normal(len(t)), CLATTER_SPECTRUM)
    puff *= how_loud(-60 * t / t60_s) * np.minimum(t / 0.0033, 1)
    return round(s * SR) - 80, how_loud(db - crest_db) * puff, np.full(len(t), -1.5)


def walls(x):
    """Diffuse reflection: scattered echoes from ground and walls, different in each channel."""
    t = np.arange(6000) / SR
    signs = rng.choice([-1., 1.], (6000, 2)).T
    sparse = rng.random((6000, 2)).T < .05
    taps = signs * sparse * how_loud(-60 * t / 0.068) * (t > .003)
    return signal.oaconvolve(x, taps / np.linalg.norm(taps[0]), axes=1)[:, :N]


# Spectrum of the wing hiss. Each row: frequency in Hz, density in dB per Hz.
WING_SPECTRUM = [(5880, -35), (10000, -19), (10900, -16), (13000, -1), (15600, -17)]
# The soft ring of the wing: frequency in Hz, width in Hz, level against the hiss in dB.
WING_MODE = (12750, 220, -9)
# Bursts of the insect. Each row: start in seconds, length in seconds, mid-burst level in dB.
INSECT_BUZZES = [(0, .27, -51), (.62, .26, -59), (2.135, .5, -50), (2.678, 0.33, -49.5), (4.948, 0.41, -48),
                 (5.7, .16, -62), (6.612, .415, -49.5), (7.384, .26, -62), (8.71, .12, -59)]


def buzz(s, length, level_db):
    """Amplitude modulation: fast wing strokes gate a high hiss with one soft ring."""
    t = np.arange(0, length, 1 / SR)
    rise_s, fall_s, arch_db, strokes_per_s = .03, .04, -5, 260
    # a burst at time zero is already under way
    ends = np.clip(np.minimum((t + (s == 0)) / rise_s, (length - t) / fall_s), 0, 1)
    level = ends * how_loud(level_db + arch_db * (2 * t / length - 1) ** 2)
    turns = np.cumsum(strokes_per_s * (1 + .1 * wander(len(t), .01))) / SR
    strokes = (.6 + np.exp(-(turns % 1) / .4)) * rng.standard_normal(len(t))
    hz, width, ring_db = WING_MODE
    ring = how_loud(ring_db) * evened(resonate(strokes, np.full(len(t), hz), width))
    return round(s * SR), level * (colour(strokes, WING_SPECTRUM) + ring), np.full(len(t), -9)


# Spectrum of the wind rumble. Each row: frequency in Hz, density in dB per Hz.
WIND_SPECTRUM = [(12, -16), (25, -23), (40, 0), (60, 5), (110, -30), (300, -70)]
# Gusts. Each row: time of the peak in seconds, relative level in dB.
GUSTS = [(.3, -33), (4.15, -34), (4.62, -42), (5.2, -41), (5.67, -37), (6.6, -39)]


def wind():
    """Incoherent turbulence: light wind rumbles at each microphone port on its own, swelling in gusts."""
    t = np.arange(N) / SR
    breeze_db, slope_db_per_s = -53, 77
    level = how_loud(breeze_db) + sum(how_loud(db - slope_db_per_s * abs(t - s)) for s, db in GUSTS)
    ports = np.array([colour(noise, WIND_SPECTRUM) for noise in rng.standard_normal((N, 2)).T])
    return level * ports * how_loud([[-1.5], [1.5]])  # stronger at right


def scene():
    """Superposition of engine, wind, tracks with their echoes, and the insect."""
    steady = engine() + fan_and_gears() + wind()
    tracks, insect = np.zeros((2, 2, N))
    for rows in PIN_SQUEALS:
        add(tracks, *squeal(rows))
    for source, table in ((whistle, LINK_WHISTLES), (whistle, chirps()), (grind, STONE_GRINDS),
                          (grind, faint_grinds()), (ping, SPROCKET_PINGS), (knock, GROUND_KNOCKS)):
        for row in table:
            add(tracks, *source(*row))
    for row in INSECT_BUZZES:
        add(insect, *buzz(*row))
    return steady + tracks + how_loud(-9.0) * walls(tracks) + insect


def top_cut(x):
    """Nothing passes above the cut-off."""
    return signal.sosfilt(signal.butter(12, 15730, fs=SR, output="sos"), x)


def record(dry):
    """Time difference of arrival: the machine stands right of the axis, so the left port hears later."""
    left_lag_s = 1.8e-5
    n = next_fast_len(N + 64)
    delay = np.exp(-2j * np.pi * np.fft.rfftfreq(n, 1 / SR) * left_lag_s)
    late = irfft(rfft(dry[0], n) * delay, n)[:N]
    return top_cut(np.array([late, dry[1]]))


dry = scene()
out = record(dry)
log_audio(out)
```